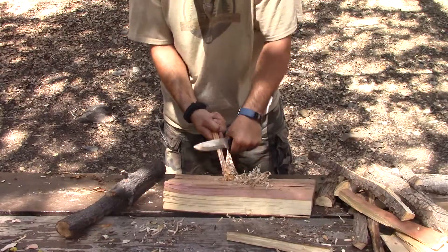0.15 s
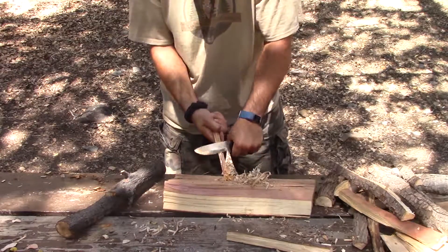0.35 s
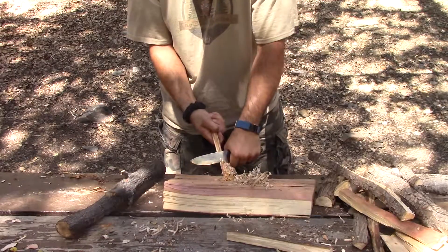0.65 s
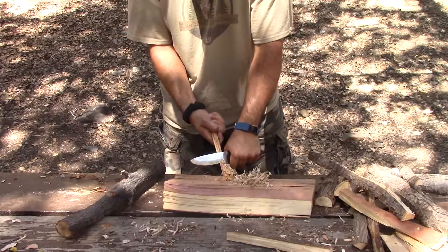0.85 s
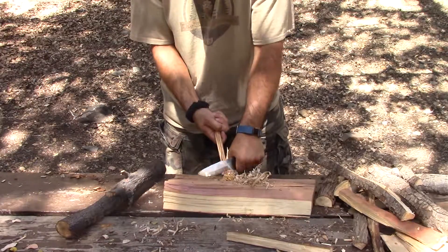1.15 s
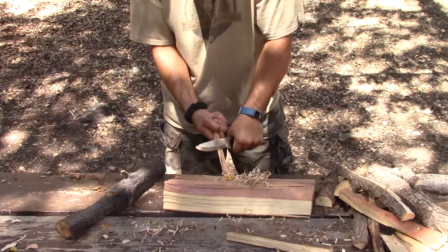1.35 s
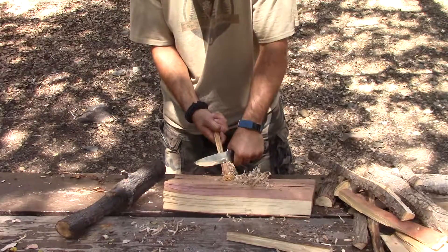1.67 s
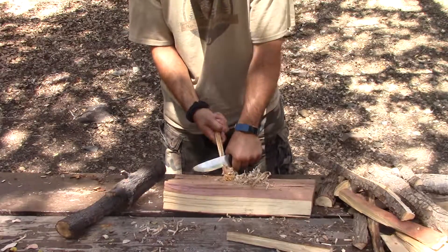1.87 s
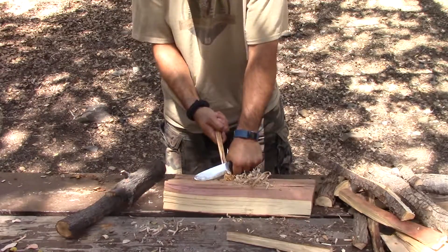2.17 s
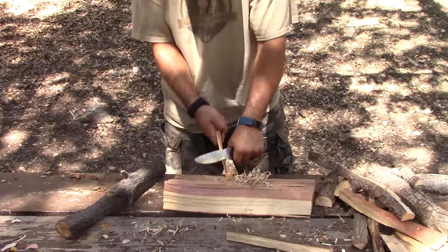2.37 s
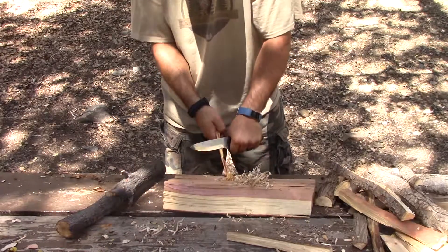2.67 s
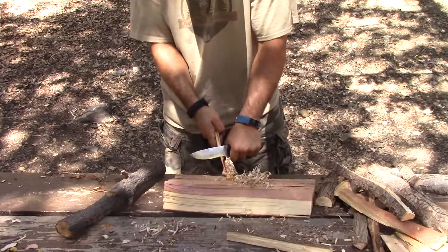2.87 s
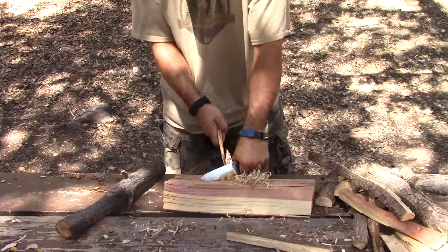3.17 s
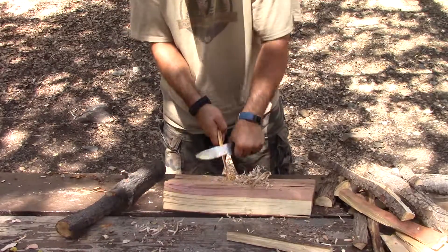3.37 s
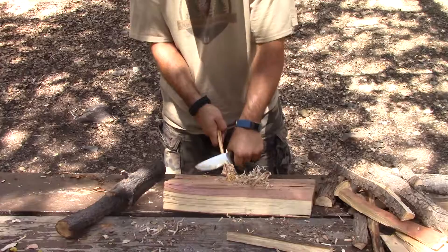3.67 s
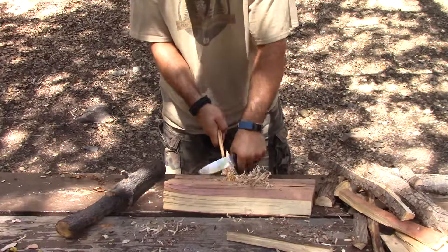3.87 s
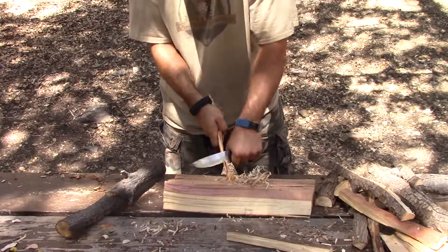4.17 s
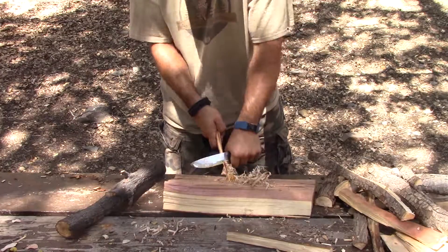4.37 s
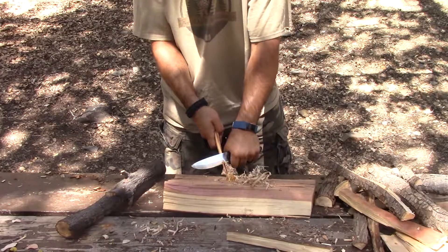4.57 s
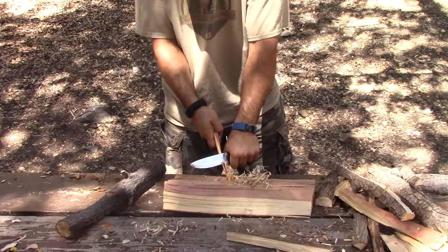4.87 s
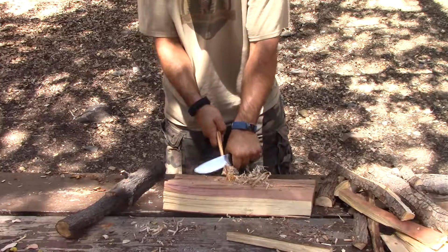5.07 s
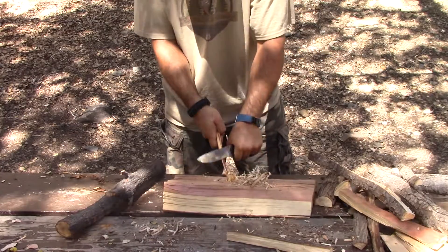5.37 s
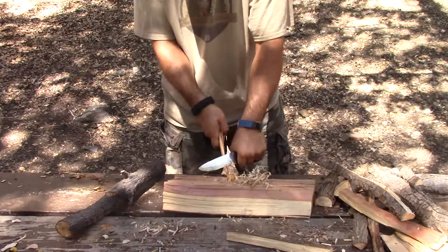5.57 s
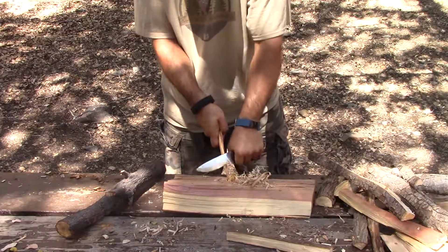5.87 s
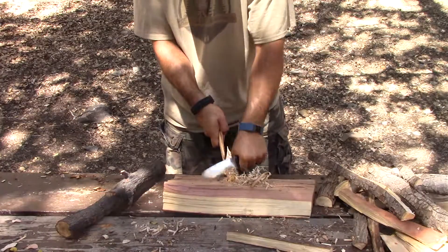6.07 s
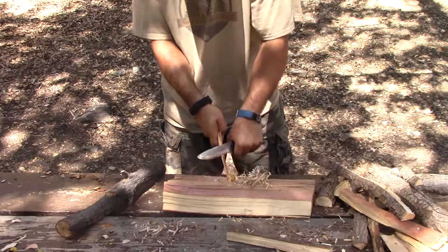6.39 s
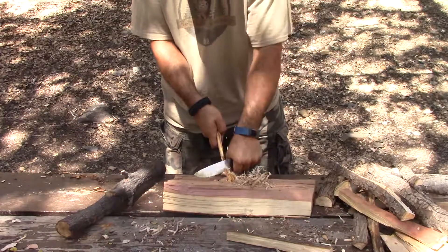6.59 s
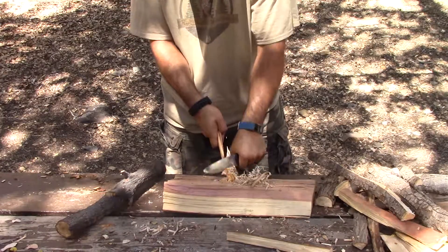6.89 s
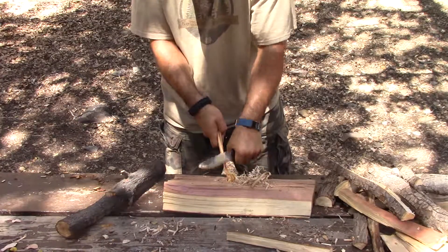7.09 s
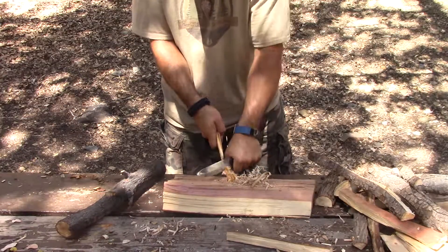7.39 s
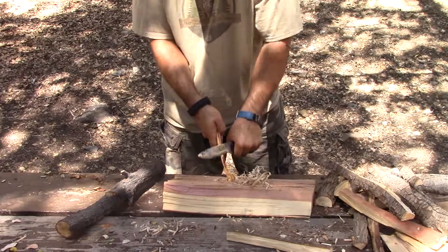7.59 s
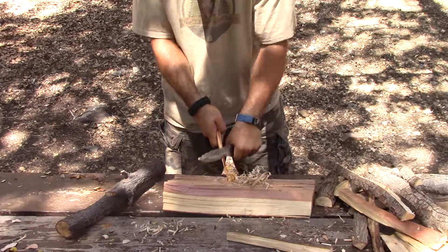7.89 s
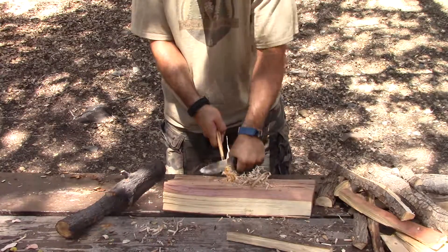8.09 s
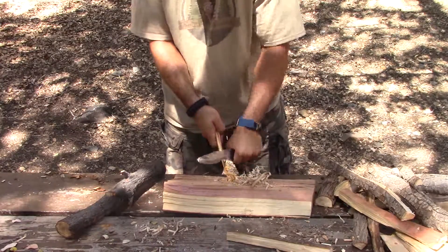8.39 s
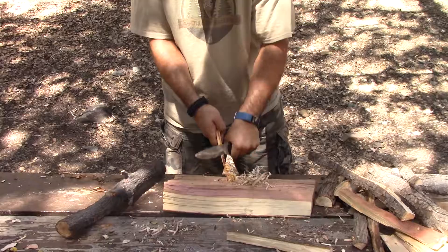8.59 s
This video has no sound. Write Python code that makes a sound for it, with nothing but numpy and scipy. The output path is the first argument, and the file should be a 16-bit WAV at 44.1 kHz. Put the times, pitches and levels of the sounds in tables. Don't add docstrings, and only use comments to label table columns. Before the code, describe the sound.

Repeated gritty scrapes of a blade on wood, growing stronger toward the end, over low wind buffets, faint motor ticking and thin bird whistles.

```python
import sys
import numpy as np
from scipy import signal
from scipy.fft import rfft, irfft
from scipy.io import wavfile
from scipy.ndimage import uniform_filter1d

SR = 44100
rng = np.random.default_rng(int(sys.argv[2]) if len(sys.argv) > 2 else 0)


def makeup_ratio(level_db):
    decades = np.asarray(level_db, float) / 20
    return 10 ** decades


def output_pcm(signal):
    pcm = np.clip(np.atleast_2d(signal).T, -1, 1) * 32767
    wavfile.write(sys.argv[1], SR, np.round(pcm).astype(np.int16))


N = 385434


def rms_one(x):
    return x / np.sqrt(np.mean(x ** 2) + 1e-20)


def evened(x, size):
    return x / np.sqrt(uniform_filter1d(x ** 2, size=size) + 1e-20)


def curve(rows):
    t_s, value = np.transpose(rows)
    return np.interp(np.arange(N) / SR, t_s, value)


def coloured(x, spectrum):
    top_hz = 15850
    hz, db = np.transpose(spectrum)
    f = np.maximum(np.arange(N // 2 + 1) * SR / N, 1)
    gain = makeup_ratio(np.interp(np.log(f), np.log(hz), db))
    return irfft(rfft(x) * gain * (f < top_hz), N)


def band(x, low_hz, high_hz):
    sos = signal.butter(2, [low_hz, min(high_hz, 13500)], "band", fs=SR, output="sos")
    return signal.sosfilt(sos, x)


def resonance(x, hz, width_hz):
    r = np.exp(-np.pi * width_hz / SR)
    poles = [1, -2 * r * np.cos(2 * np.pi * hz / SR), r * r]
    return signal.lfilter(np.array([1, 0, -1]) * (1 - r * r) / 2, poles, x + 1e-18)


def drift(rate_hz):
    r = np.exp(-40 * np.pi * rate_hz / SR)
    noise = rng.standard_normal(N // 20 + 3002)
    slow = signal.lfilter([1], [1, -2 * r, r * r], noise)[3000:]
    return np.interp(np.arange(N) / 20, np.arange(len(slow)), rms_one(slow))


def add(out, s, piece):
    i = round(s * SR)
    out[i:i + len(piece)] += piece[:N - i]


def pushes(start_s, length_s, db, growth_db, arch_db, rise_db_per_s, fall_db_per_s, rest_db):
    t = np.arange(0, N + 64, 64) / SR
    since_s = t - start_s[:, None]
    length_s = np.maximum(length_s, .004)[:, None]
    done = np.clip(since_s / length_s, 0, 1)
    hold_db = growth_db * done + arch_db * (1 - (2 * done - 1) ** 2)
    edge_db = rise_db_per_s * np.minimum(since_s, 0) - fall_db_per_s * np.maximum(since_s - length_s, 0)
    power = (makeup_ratio(db[:, None] + hold_db + edge_db) ** 2).sum(axis=0) + makeup_ratio(rest_db) ** 2
    return np.interp(np.arange(N) / SR, t, np.sqrt(power))


def cut(tears_per_s, spread_db, chatter_db):
    # f/Hz, density/dB per Hz
    grain = [(88, -78), (150, -5.5), (398, 1), (475, 0), (854, 0.5), (979, -5.5), (1290, 1), (1450, -8.5),
             (2140, -11), (2700, -11), (4490, -25), (5910, -32.5), (8400, -37), (10800, -37.5),
             (16000, -62)]
    torn = rng.random(N) < tears_per_s / SR
    size = makeup_ratio(spread_db * np.minimum(rng.exponential(1, N), 5))
    tears = torn * size * rng.choice([-1, 1], N)
    friction = 0.95 * rng.standard_normal(N)
    force = (rms_one(tears) + friction) * makeup_ratio(chatter_db * drift(70.0))
    sound = patches(body(coloured(force, grain), wander_db=2.5), patchy_db=2.8)
    return catches() * sum(gain * part for gain, part in zip(blade_force(), ranges(sound)))


def blade_force():
    # start/s, length/s, force/dB, weight on board/dB, fibre dryness/dB
    strokes = [(0.357, 0.061, -52, 3.5, -4), (0.944, 0.09, -47.5, -5, -2), (1.639, 0.03, -56, -2, -1.5),
               (2.078, 0.061, -51.5, -0.5, -6), (2.771, 0.087, -45, -4.5, -9.5),
               (3.026, 0.079, -48, -4, -10.8), (3.058, 0.14, -58, 0.5, 5), (3.59, 0.1, -52, -3, -6.5),
               (3.708, 0.029, -42, -4, -8), (3.727, 0.085, -44, -3.5, -6), (3.943, 0.092, -56.5, -13, -2),
               (4.125, 0.12, -44.5, -5, -8), (5.148, 0.04, -39, -4.5, -8.5), (5.232, 0.037, -50, -15, 2),
               (5.622, 0.042, -51, 2.5, -0.5), (5.738, 0.011, -49, -6, -2), (5.768, 0.025, -50.5, -2, -2),
               (6.127, 0.059, -44.5, -2.5, -3.5), (6.536, 0.092, -41, -3, -7),
               (6.946, 0.069, -49, -3, -2.7), (7.312, 0.089, -39, -4, -10),
               (7.711, 0.077, -35.5, -7.5, -10), (8.103, 0.032, -38, -7.5, -8.5),
               (8.427, 0.087, -36.5, -3.5, -9.5)]
    # start/s, length/s, force/dB, fibre dryness/dB
    light = [(0.067, 0.18, -62.5, -3), (0.388, 0.26, -60.5, -5), (1.271, 0.042, -58, 1),
             (1.282, 0.12, -66.5, -0.5), (1.532, 0.1, -58.5, -4), (1.845, 0.25, -59, -1.3),
             (2.274, 0.021, -73, 11), (2.43, 0.11, -63.5, 2), (2.661, 0.083, -57, -5.5),
             (3.349, 0.12, -62, 0.5), (4.552, 0.0066, -55.5, -0.5), (5.139, 0.057, -62.5, 11.5),
             (5.32, 0.027, -57.5, -3), (5.455, 0.021, -63, 3.5), (5.54, 0.058, -63, -1.5),
             (5.67, 0.083, -78.5, 18.5), (6.116, 0.032, -52.5, 2), (6.323, 0.093, -67.5, 2),
             (6.508, 0.012, -61.3, 3), (6.7, 0.046, -85.5, 24.5), (6.922, 0.038, -68, 16),
             (7.15, 0.078, -78, 11.5), (7.288, 0.12, -57.6, 5), (7.486, 0.15, -80.5, 13),
             (7.677, 0.027, -68, 19.5), (7.944, 0.055, -69.9, 8), (8.063, 0.091, -59, 8),
             (8.292, 0.06, -63.5, 2.5), (8.406, 0.046, -53.5, 7.5), (8.653, 0.051, -65.5, 6)]
    # delay/share of stroke, rise/dB per s, mid-stroke swell/dB, fall/dB per s, level/dB, rest/dB
    answer = [
        (0.5, 400, 1.5, 260, 3, -70),
        (0.24, 500, 4, 420, 5, -69),
        (-0.069, 700, 7, 600, -2.5, -70.5),
        (-0.08, 650, 5.5, 1000, -7.5, -89),
        (-0.091, 900, 2.5, 1294, -6, -76.5),
    ]
    drag_weight_db, drag_scrape_db = -3.5, 2
    scrape_follows = 0.85
    drags = [(s, length, db, drag_weight_db, dryness) for s, length, db, dryness in light]
    s, length, db, weight, dryness = np.transpose(list(strokes) + drags)
    rub = scrape_follows * dryness + drag_scrape_db * (np.arange(len(s)) >= len(strokes))
    leans = (weight, weight, 0, rub, dryness)
    for (late, rise, arch_db, fall, level_db, rest_db), lean_db in zip(answer, leans):
        start_s, hold_s = s + late * length, (1 - late) * length
        yield pushes(start_s, hold_s, db + level_db + lean_db, 0, arch_db, rise, fall, rest_db)


def catches():
    # t/s, force change/dB
    surges = [(.925, -10), (.966, -3), (1.017, -6), (2.122, -5), (2.155, -4), (2.758, -7), (2.78, 5),
              (2.797, 0), (2.835, 2), (3.036, -1.5), (3.072, -1.5), (3.091, 3), (3.111, -2), (3.183, -9),
              (3.597, 0), (3.61, 4), (3.707, 0), (3.722, 0), (3.741, 4), (3.755, -1), (3.776, -3.5),
              (3.8, 1), (4.118, -4), (4.14, 3), (4.17, 0.5), (4.2, 1), (4.233, -2), (5.605, -6),
              (5.653, 1.5), (5.679, -4), (5.758, -6), (6.136, 3), (6.174, 0), (6.189, -6), (6.53, -2.5),
              (6.55, 2), (6.57, 2.5), (6.6, 0.5), (6.63, 0), (6.968, 6), (6.989, -7), (7.33, 1.5),
              (7.355, 2), (7.375, 2.5), (7.39, -1), (7.72, 1.5), (7.75, 2.5), (7.77, 4), (8.085, 1),
              (8.111, 0), (8.158, -6), (8.41, 0), (8.43, 2), (8.48, 2.5), (8.507, -3.5), (8.53, 2.5)]
    catch_s = 0.0056
    t = np.arange(0, N + 64, 64) / SR
    s, db = np.transpose(surges)
    change_db = db @ np.exp(-((t - s[:, None]) / catch_s) ** 2)
    return makeup_ratio(np.interp(np.arange(N) / SR, t, change_db))


def body(x, wander_db):
    # f/Hz, width/Hz, boost/dB (negative: a dip)
    modes = [(267, 81, 12), (406.6, 11.9, 14), (513, 81, 5), (625, 5, 6.5), (868, 28, 4.5), (1040, 30, 5.5),
             (1271, 30, 6.5), (1588, 153, 4.5), (2040, 240, -7), (3100, 210, 3), (2740, 220, 6),
             (4660, 800, -22), (5300, 85, -0.5), (6050, 450, 9), (7220, 710, 5.5), (9220, 330, 7.5),
             (9940, 240, 4)]
    # t/s, share
    seated = [(0, .45), (2.3, .5), (2.7, .9), (5.0, .8), (6.0, 1.0), (8.74, 1.1)]
    ring = np.zeros(N)
    for hz, width_hz, boost_db in modes:
        share = (makeup_ratio(boost_db) - 1) * makeup_ratio(wander_db * drift(10.5))
        ring += share * resonance(x, hz, width_hz)
    return x + curve(seated) * ring


def patches(x, patchy_db):
    frames = signal.stft(x, nperseg=512)[2]
    islands = rng.standard_normal(frames.shape)
    for axis, size in ((0, 5), (0, 5), (1, 8), (1, 8)):
        islands = uniform_filter1d(islands, size=size, axis=axis)
    return signal.istft(frames * makeup_ratio(patchy_db * rms_one(islands)), nperseg=512)[1][:N]


def ranges(x):
    centres = [230, 500, 1150, 2900, 7500]
    pitch = np.log(np.maximum(np.arange(N // 2 + 1) * SR / N, 1))
    spectrum = rfft(x)
    for share in np.eye(len(centres)):
        weight = np.sin(np.pi / 2 * np.interp(pitch, np.log(centres), share)) ** 2
        yield evened(irfft(spectrum * weight, N), size=2000)


def bursts(rows, octaves, rise_s, click):
    out, t = np.zeros(N), np.arange(4000) / SR
    for s, db, hz, t60 in rows:
        hit = click * (np.arange(len(t)) == round(rise_s * SR))
        decay = makeup_ratio(-60 * t / max(t60, .002)) * np.minimum(t / rise_s, 1)
        noise = rng.standard_normal(len(t)) * decay
        crack = band(hit + noise, hz / 2 ** octaves, hz * 2 ** octaves)
        add(out, s, makeup_ratio(db) * crack / np.abs(crack).max())
    return out


def knocks():
    # t/s, peak/dB, centre f/Hz, t60/s
    hits = [(0.368, -35, 650, 0.097), (0.941, -29.5, 660, 0.037), (2.132, -30, 640, 0.026),
            (2.771, -29.5, 770, 0.074), (2.8, -29.5, 1260, 0.024), (3.088, -28.5, 760, 0.045),
            (3.195, -30, 750, 0.029), (3.445, -37.5, 1080, 0.023), (4.276, -38, 1400, 0.11),
            (4.556, -44, 600, 0.035), (5.146, -15.5, 880, 0.034), (5.177, -12, 780, 0.026),
            (5.268, -26, 1510, 0.0095), (6.2, -37, 1190, 0.032), (8.393, -33.5, 700, 0.038),
            (6.133, -29.5, 1160, 0.036), (4.127, -36, 1100, .03), (3.605, -39, 1300, .03),
            (7.301, -38, 1100, 0.028), (8.098, -33, 900, .02), (5.13, -43, 1200, .02),
            (3.719, -38, 940, .02), (3.739, -29.5, 1150, .02), (5.2, -36, 1000, 0.035),
            (3.02, -39, 1060, .03)]
    return makeup_ratio(-1.5) * body(bursts(hits, octaves=0.59, rise_s=0.00067, click=8.0), wander_db=-4.0)


def snaps():
    # t/s, peak/dB, centre f/Hz, t60/s
    fibres = [(0.0542, -32, 5600, 0.011), (1.0284, -30, 5630, 0.011), (1.2996, -42, 3200, 0.014),
              (1.6347, -51, 7400, 0.02), (1.9772, -26, 6700, 0.018), (2.0066, -46, 5390, 0.029),
              (2.269, -50, 9910, 0.02), (2.2872, -40.5, 9100, 0.0068), (2.3044, -46, 4870, 0.02),
              (2.37, -39.5, 7380, 0.012), (2.4457, -41, 6360, 0.0099), (2.5865, -62, 4580, 0.02),
              (3.5882, -45.5, 4150, 0.012), (4.5526, -49, 6860, 0.025), (4.81, -45, 6000, 0.011),
              (5.2135, -44, 4100, 0.014), (5.243, -39, 6280, 0.02), (5.2669, -45, 6080, 0.02),
              (5.336, -48, 7140, 0.02), (5.734, -41, 6500, 0.015), (5.7393, -29, 6400, 0.014),
              (1.86, -50, 4000, .01), (1.905, -48, 3000, .012), (1.945, -49, 3200, .01),
              (2.057, -47, 3500, .012), (2.087, -46, 2700, .012), (2.49, -49, 3200, .012),
              (2.52, -50, 4000, .01), (5.7673, -45, 4160, 0.02), (5.7965, -34, 7800, 0.025),
              (8.6983, -46, 5660, 0.0055), (5.195, -49, 7500, 0.012), (8.536, -45, 8500, 0.0085),
              (3.388, -45, 4000, 0.012), (4.296, -46, 5000, 0.012), (1.017, -46, 9500, 0.01)]
    # t/s, peak/dB, centre f/Hz, t60/s
    slips = [(1.0275, -22, 1750, 0.012), (1.037, -32, 2300, .012), (0.061, -35.5, 2300, 0.013),
             (1.9785, -38, 2200, .012), (5.154, -22, 1300, .03), (5.195, -36, 1900, .01)]
    return bursts(list(fibres) + list(slips), octaves=0.65, rise_s=0.00031, click=3.0)


def return_whistles(hz, width_hz):
    # t/s, length/s, level/dB
    returns = [
        (3.35, .14, -54),
        (3.94, .11, -51),
    ]
    tone = resonance(resonance(rng.standard_normal(N), hz, width_hz), hz, width_hz)
    shape = np.zeros(N)
    for s, length, db in returns:
        add(shape, s, makeup_ratio(db) * np.hanning(int(length * SR)) ** .25)
    return evened(tone, size=2600) * shape


def wind(lumpy_db, sharp):
    # f/Hz, density/dB per Hz
    wind_colour = [(12, -72), (20, -26.5), (141, 5), (225, 2.5), (416, -13.5), (464, -22), (742, -28),
                   (955, -65), (1270, -75), (1500, -74), (1950, -63), (3300, -120)]
    # start/s, length/s, level/dB, change over gust/dB
    gusts = [(0.004, 0.2, -47.5, -2), (0.271, 0.02, -46.5, 8), (0.421, 0.013, -25.5, -5.5),
             (0.492, 0.076, -43, 10.5), (0.719, 0.079, -58.5, 6), (0.922, 0.32, -47.5, -16),
             (1.281, 0.17, -40, 3.5), (1.473, 0.12, -46.5, -5), (1.623, 0.03, -45, 16),
             (1.84, 0.22, -36, -7), (2.042, 0.21, -50, 6), (2.365, 0.043, -47, -2), (2.585, 0.014, -40, -9),
             (2.702, 0.031, -41.5, 1.5), (2.817, 0.15, -42, 2.5), (3.028, 0.28, -41, -17),
             (3.413, 0.11, -49, -5), (3.624, 0.21, -53.5, 3.5), (4.192, 0.14, -44.5, -6),
             (4.566, 0.16, -50.5, 0), (5.19, 0.094, -45, -6.5), (5.61, 0.1, -39.2, -9.5),
             (5.772, 0.17, -43, -3), (6.076, 0.13, -56, 7.5), (6.7, .06, -52, 0), (7.9, .08, -50, 0),
             (5.48, .06, -52, 0), (4.75, .06, -54, 0), (6.612, 0.088, -47.5, -1), (6.786, 0.3, -54, 2.5),
             (7.383, 0.23, -52, -1), (8.128, 0.091, -31, -3), (8.23, 0.26, -36, -7),
             (8.614, 0.083, -36.5, -6)]
    # crest t/s, peak/dB, f/Hz
    thumps = [(0.257, -33, 139), (0.4171, -11, 230), (0.5788, -30, 278), (1.3, -27, 220),
              (1.325, -22.5, 191), (2.72, -33, 200), (2.875, -33, 200), (3.727, -28, 250),
              (3.739, -29, 260), (5.645, -29.5, 260), (6.981, -26.5, 250), (8.249, -32, 170),
              (8.357, -30, 190), (8.625, -31.5, 190), (1.3726, -27, 307), (1.4127, -27, 189),
              (1.6609, -22, 195), (1.849, -32.5, 188), (1.921, -25.5, 203), (2.356, -37.5, 198),
              (2.5783, -31.5, 154), (2.746, -31, 200), (2.9218, -28.5, 170), (2.9804, -29, 183),
              (4.564, -34, 150), (5.6042, -32, 149), (5.8244, -29.5, 172), (8.1504, -15.5, 159),
              (8.192, -15, 146), (8.2337, -25, 174), (8.2957, -39, 199)]
    rumble = coloured(rng.standard_normal(N) * makeup_ratio(0), wind_colour) * makeup_ratio(lumpy_db * drift(26.0))
    s, length, db, change_db = np.transpose(gusts)
    gain = pushes(s, length, db, change_db[:, None], 0, rise_db_per_s=265, fall_db_per_s=300, rest_db=-69)
    out = gain * evened(rumble, size=3500)
    for s, db, hz in thumps:
        cycles = np.arange(int(3.6 * SR / hz)) * hz / SR - 1.6
        swing = np.exp(-(cycles / 0.74) ** 2) * np.cos(2 * np.pi * cycles)
        crest = sharp * np.exp(-(cycles / 0.53) ** 2) * np.cos(4.4 * np.pi * cycles)
        add(out, s - 1.59 / hz, makeup_ratio(db) * (swing + crest))
    return out


def lens_motor(level_db, first_db):
    # f/Hz, width/Hz, level/dB
    motor = [
        (2080, 260, 0),
        (2300, 300, 0),
        (2500, 240, -6),
    ]
    frame_s, start_s, rebound_s = 1.001 / 60, .0155, .0035
    steps = (np.arange(58)[:, None] * 9 + [0, 2, 4, 6]).ravel()
    at = ((steps * frame_s + start_s) * SR).astype(int)
    strength = makeup_ratio(level_db + first_db * (steps % 9 == 0) + 2 * rng.standard_normal(len(at)))
    clicks = np.zeros(N)
    clicks[at] = strength
    clicks[at + int(rebound_s * SR)] = .5 * strength
    return sum(makeup_ratio(db) * resonance(resonance(clicks, hz, width_hz), hz, width_hz) for hz, width_hz, db in motor)


def bird(scoop_hz):
    # t/s, length/s, level/dB, f/Hz
    singing = [(1.28, .16, -63, 3275), (2.045, .19, -62.5, 3255), (2.89, .13, -61, 3260),
               (3.805, .09, -59.5, 3270), (4.57, .1, -60, 3245), (4.67, .08, -67, 3235),
               (5.33, .1, -61, 3250), (6.17, .11, -63, 3255), (6.86, .14, -62, 3250),
               (7.64, .08, -62, 3270), (8.53, .06, -64, 3290)]
    out, waver = np.zeros(N), drift(12.0)
    for s, length, db, hz in singing:
        t = np.arange(int(length * SR)) / SR
        phase = 2 * np.pi * np.cumsum(hz - scoop_hz * np.exp(-t / 0.0234)) / SR
        note = np.sin(phase + 1.2 * waver[int(s * SR):][:len(t)])
        add(out, s, makeup_ratio(db) * np.hanning(len(t)) ** 0.2 * note)
    return out * makeup_ratio(2.0 * drift(30.0))


def open_air(level_db):
    # f/Hz, density/dB per Hz
    air = [(24, -37), (40, -40), (70, 5.5), (406, -3), (449, -1.5), (608, -1.5), (782, -5.5), (1400, -6.5),
           (1840, -12), (2090, -9.5), (2900, -13), (11300, -29), (16500, -43)]
    hush = rms_one(coloured(rng.standard_normal(N), air))
    return makeup_ratio(level_db) * hush * makeup_ratio(0.094 * drift(6.0))


def gain_control():
    # t/s, gain/dB
    gain = [(0, -5), (.6, -3.5), (.68, -12.5), (1.0, -5), (1.3, -7.5), (1.65, -7.5), (1.72, -9.5),
            (2.1, -3.5), (5.1, -4.5), (8.2, -3.5), (8.55, -5), (8.74, -12)]
    return makeup_ratio(curve(gain))


def scene():
    knife = cut(tears_per_s=3000.0, spread_db=3.7, chatter_db=2.5)
    knife += knocks() + snaps() + return_whistles(hz=1048, width_hz=66.0)
    gusts = wind(lumpy_db=4.0, sharp=0.22)
    motor = lens_motor(level_db=-16.5, first_db=3.0)
    background = (open_air(level_db=-52.5) + bird(scoop_hz=80.0) + motor) * gain_control()
    return (knife + gusts + background)[None]


def roll_off(x):
    return signal.sosfilt(signal.butter(12, 16640, fs=SR, output="sos"), x)


def record(dry):
    overload = .33
    rounded = overload * np.tanh(dry / overload)
    low_cut = signal.butter(3, 62.0, "high", fs=SR, output="sos")
    return roll_off(signal.sosfilt(low_cut, rounded))


dry = scene()
out = record(dry)
output_pcm(out)
```